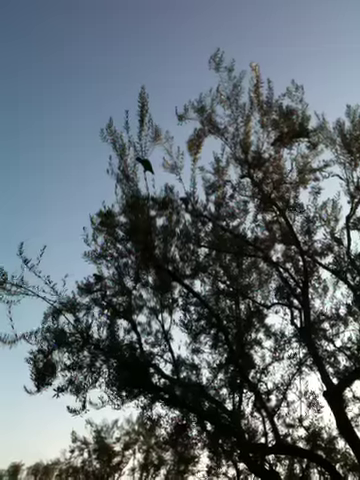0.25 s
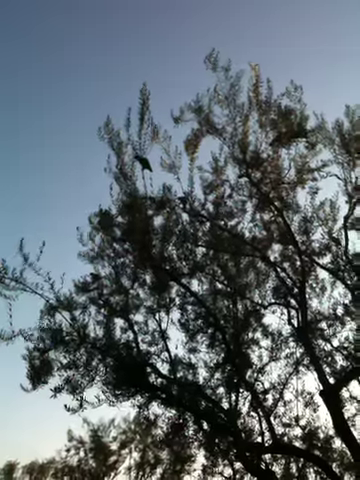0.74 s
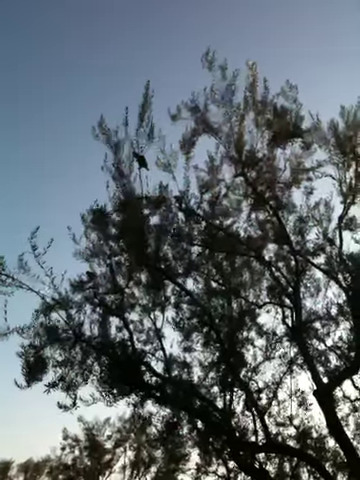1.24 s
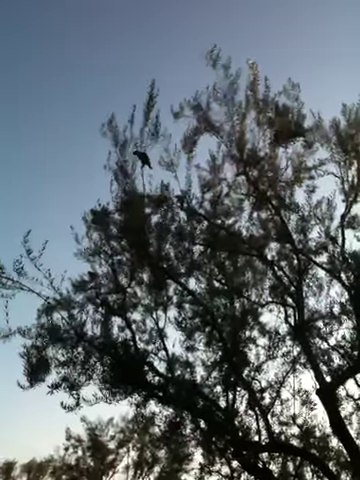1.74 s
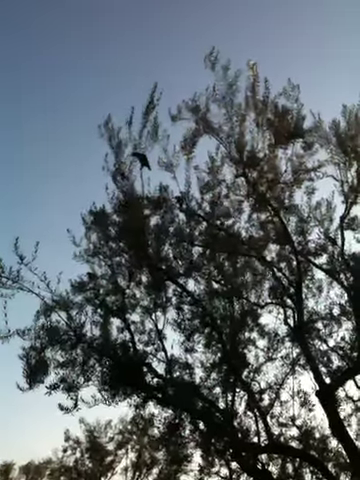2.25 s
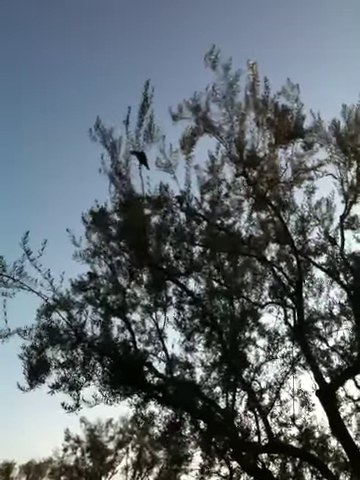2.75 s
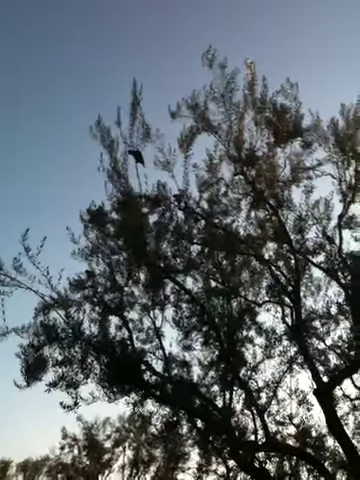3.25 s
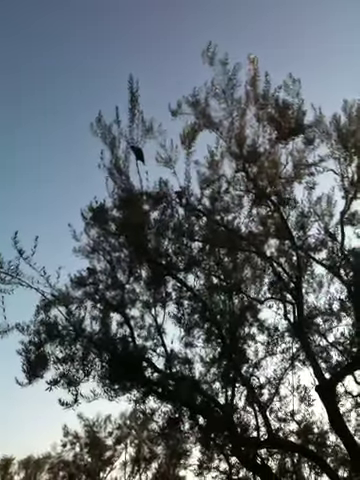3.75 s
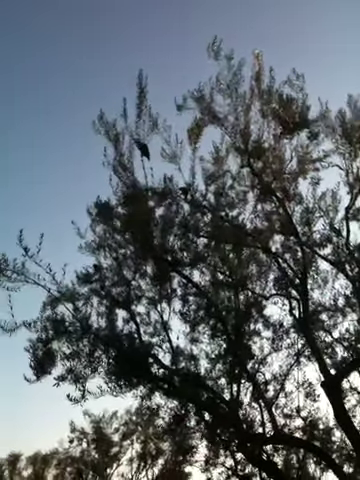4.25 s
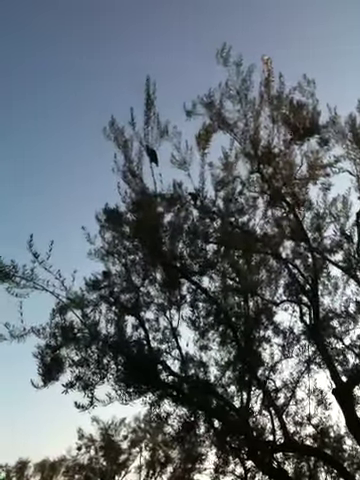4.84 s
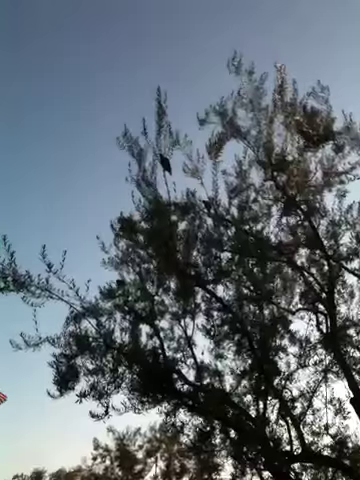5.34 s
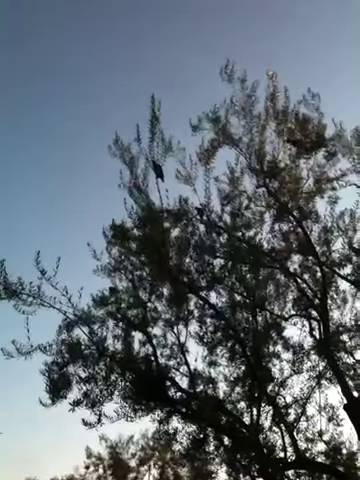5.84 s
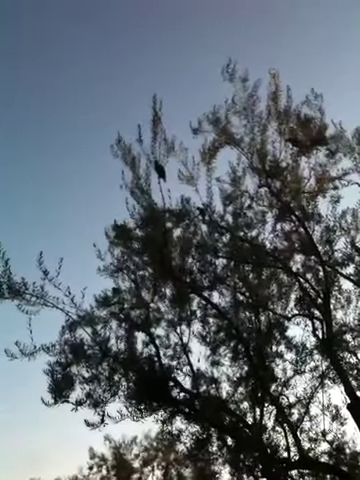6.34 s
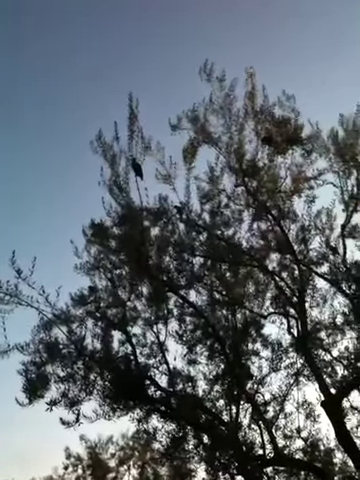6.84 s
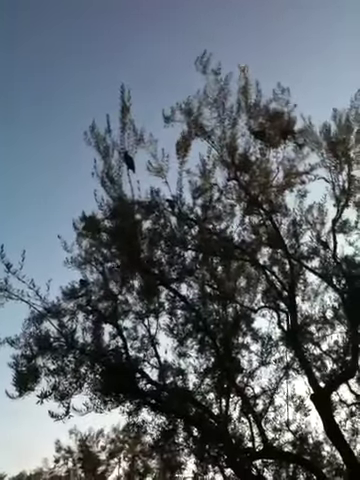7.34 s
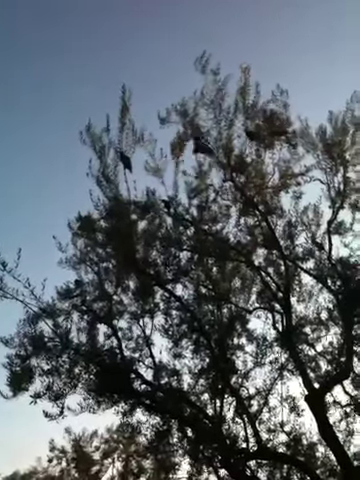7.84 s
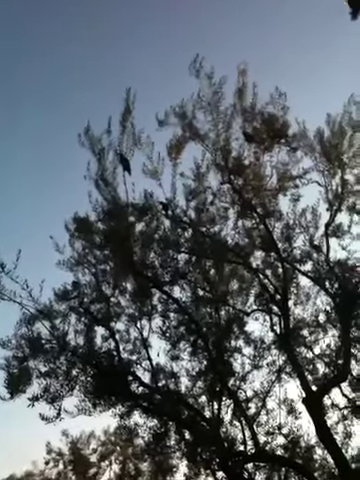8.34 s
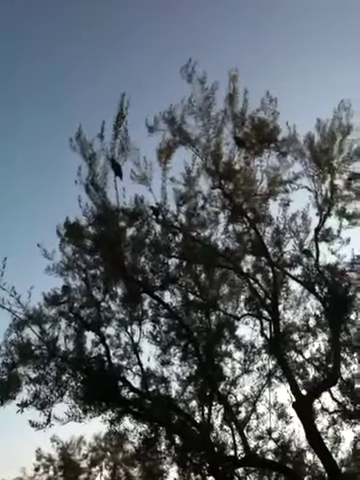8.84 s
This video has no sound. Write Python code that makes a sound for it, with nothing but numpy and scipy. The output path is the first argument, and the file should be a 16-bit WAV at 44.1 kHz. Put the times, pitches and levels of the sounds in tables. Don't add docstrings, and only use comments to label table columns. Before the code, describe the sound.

Outdoor phone capture of a small parrot flock: harsh, nasal squawks around a few kilohertz, broken by quick whistles and buzzing slides. Calls come in clusters with short gaps; a strong pair at four seconds, a lull with a soft far hoarse call at six, then dense loud screeching from seven to just past eight. Low, muffled wind bumps and a dull distant hum lie underneath.

```python
import sys
import numpy as np
from scipy import signal
from scipy.fft import rfft, irfft, next_fast_len
from scipy.io import wavfile
from scipy.ndimage import uniform_filter1d, map_coordinates

SR = 44100
rng = np.random.default_rng(int(sys.argv[2]) if len(sys.argv) > 2 else 0)


def invert_db(level):
    return 10 ** (np.asarray(level, dtype=float) / 20)


def file_out(sig):
    cols = np.atleast_2d(sig).T
    lim = np.clip(cols, -1, 1)
    pcm = np.round(lim * 32767).astype(np.int16)
    wavfile.write(sys.argv[1], SR, pcm)


N = 401310


def unit(x):
    return x / np.sqrt(np.mean(x ** 2) + 1e-20)


def level(x, span_s):
    power = uniform_filter1d(x ** 2, int(span_s * SR))
    return x / np.sqrt(np.abs(power) + 1e-12)


def curves(rows):
    time_s, *columns = np.transpose(rows)
    return [np.interp(np.arange(N) / SR, time_s, column) for column in columns]


def wobble(rate_hz):
    knots = rng.standard_normal(int(N * rate_hz / SR) + 4)
    return map_coordinates(knots, [np.arange(N) * rate_hz / SR])


def coloured(x, points):
    size = next_fast_len(N + 8192)
    hz, db = np.transpose(points)
    bins_hz = np.fft.rfftfreq(size, 1 / SR)
    gain = invert_db(np.interp(np.log(bins_hz + 1), np.log(hz), db))
    return irfft(rfft(x, size) * gain, size)[:N]


# pitch_hz, level_db (per Hz)
HUM_SPECTRUM = [(120, -17), (200, -2), (407, -9), (1950, -13.5), (2700, -22.5), (7770, -26), (11600, -38),
                (15500, -46)]


def hum():
    noise = unit(coloured(rng.standard_normal(N), HUM_SPECTRUM))
    return invert_db(-54 + 1.14 * wobble(3.07)) * noise


# start_s, level_db (peak), pitch_hz
STRONG_PUFFS = [(2.035, -30, 233), (2.714, -22, 209), (2.758, -28.5, 170), (2.861, -18.5, 328.5),
                (2.886, -21.5, 219.5), (2.901, -33, 146.4), (2.98, -26, 240), (2.996, -30.5, 164.8),
                (3.052, -26.5, 212), (3.069, -28.5, 193), (3.313, -30, 156), (3.901, -28, 202.6),
                (3.923, -29.5, 221.7), (3.942, -29, 196.7), (4.101, -27, 254), (4.118, -27, 207),
                (4.131, -27, 226.2), (4.546, -29, 238.4), (4.861, -26.5, 193.4), (5.195, -29.5, 271.5),
                (5.274, -28.5, 210.3), (5.304, -28.5, 237.3), (5.364, -21.5, 178.2), (5.384, -23.5, 241),
                (5.397, -27, 213.5), (5.432, -24.5, 220.4), (9.069, -21.5, 254.5), (9.08, -23, 269.4)]
LIGHT_PUFFS = [3.108, 3.185, 3.212, 3.235, 3.252, 3.27, 3.504, 4.077, 4.153, 4.388, 4.632, 4.733, 5.059,
               5.1, 5.244, 7.814, 8.192, 8.347, 8.565, 9.027]
FAINT_PUFFS = [1.226, 1.634, 1.737, 1.862, 1.932, 2.089, 2.649, 2.796, 3.679, 3.797, 3.857, 4.482, 4.608,
               5.017, 5.479, 7.756, 8.472, 8.73, 8.805, 8.943]
# start_s, level_db
BREEZE = [(0, -59), (.7, -58), (1.7, -57.5), (2.1, -58.5), (2.35, -52), (2.6, -60), (3.4, -53.5),
          (3.68, -47), (3.82, -49.5), (4.95, -51), (5.06, -60.5), (5.16, -57.5), (5.7, -55.5), (7.3, -54.5),
          (7.85, -53), (8.45, -49.5), (8.75, -51.5), (9.1, -43.5)]
# pitch_hz, level_db (per Hz)
PORT = [(24, -61), (40, -33), (134, 1), (189, 1), (326, -13), (412, -17.5), (501, -18), (900, -28),
        (1170, -21), (1980, -120)]


def wind():
    soft_hz = 206
    puffs = list(STRONG_PUFFS)
    puffs += [(s, -33.5, soft_hz * invert_db(1.87 * rng.standard_normal())) for s in LIGHT_PUFFS]
    puffs += [(s, -44.5, soft_hz * invert_db(2 * rng.standard_normal() - 2.5)) for s in FAINT_PUFFS]
    out = np.zeros(N + SR)
    for start_s, level_db, pitch_hz in puffs:
        cycles = np.arange(-600, 900) / SR * pitch_hz
        shape = np.exp(-(cycles / np.where(cycles < 0, .45, .8)) ** 2 / 2)
        wave = np.cos(2 * np.pi * (cycles - 0.21 * cycles * cycles + rng.uniform(0, 1)))
        out[round(start_s * SR) - 600:][:1500] += invert_db(level_db) * shape * wave
    thumps = coloured(out[:N], [(50, -19), (120, 3.5)])
    gust = uniform_filter1d(uniform_filter1d(np.abs(thumps), size=5000), size=5000)
    lumps = invert_db(4 * wobble(55) + 1.5 * wobble(7))
    flutter = unit(coloured(lumps * rng.standard_normal(N), PORT))
    return thumps + (invert_db(curves(BREEZE)[0]) + 1.13 * gust) * flutter


# start_s (full voice), held_s, level_db, pitch_hz (first), bright_db
SWELLING = [(.72, 0.14, -41.5, 1633, -5), (1.069, .14, -41, 1680, -3), (1.361, 0.16, -40.5, 2580, -9.5),
            (2.52, 0.057, -36.5, 2497, -1), (2.86, 0.18, -44.5, 2798, -8.5),
            (3.76, 0.07, -40.5, 2462, -5.5), (3.939, .12, -45.5, 2003, -9), (4.74, 0.15, -31, 2513, -7),
            (6.06, 0.051, -46.5, 1518, -13), (7.371, 0.18, -32, 2307, -3), (7.65, 0.059, -26, 2426, -5.5),
            (8.295, 0.044, -31.5, 1955, -14), (9.06, 0.043, -37.5, 1570, -16)]
# start_s (full voice), held_s, level_db, pitch_hz (first), bright_db
BURSTING = [(.07, 0.14, -34, 2390, -6.5), (.19, 0.11, -39.5, 2250, -6.5), (0.969, 0.072, -39.5, 1753, -8),
            (2.15, 0.017, -45, 1563, -9), (2.396, 0.088, -39, 2756, -5.5), (3.585, 0.078, -43, 2597, -1),
            (3.702, .033, -45.5, 2550, -4), (4.095, 0.094, -32.5, 2916, -7),
            (4.2, 0.087, -31.5, 2682, -4.5), (4.937, 0.045, -42, 2805, 6.5),
            (5.31, 0.083, -40.5, 2580, -7.5), (5.435, 0.06, -39, 2794, -8.5),
            (6.727, 0.0122, -40, 2414, -9), (6.764, 0.17, -37, 2535, -7), (6.947, 0.028, -31.5, 2425, -2),
            (7.007, .022, -28, 2393, -8), (7.145, 0.045, -41, 2817, -6.5),
            (7.595, 0.029, -29.5, 2477, -6.5), (7.72, 0.094, -30, 2375, -5),
            (7.819, 0.031, -29.5, 2032, -14), (7.902, 0.035, -34, 2750, -8.5),
            (7.95, 0.091, -30.5, 2707, -5.5), (8.031, 0.14, -29.5, 2316, -7.5)]
# start_s (full voice), held_s, level_db, pitch_hz (first)
DISTANT = [(0.321, 0.15, -41.5, 2422), (1.634, 0.036, -48, 2505), (8.19, 0.028, -41.5, 1785),
           (0.879, 0.072, -46, 2104), (1.24, 0.093, -45.5, 2690), (1.58, 0.32, -51.5, 2450),
           (1.959, 0.04, -51, 2075), (2.3, 0.019, -50.5, 1707), (2.72, 0.038, -53, 2011),
           (3.07, 0.075, -55.5, 2847), (3.28, 0.27, -55.5, 2778), (4.32, 0.31, -46, 1991),
           (5.03, 0.066, -46, 2160), (5.149, 0.069, -57, 2530), (5.551, 0.17, -57, 2455),
           (6.23, 0.17, -53.5, 2783), (6.45, 0.16, -61, 3000), (7.049, 0.036, -43, 2657),
           (8.62, 0.094, -58.5, 2074), (8.961, 0.045, -58.5, 1570)]


def calls():
    swell, burst, murmur = (200, 4, 700, 0.29), (574, -3, 350, -0.5), (150, -2, 130, -9)
    distant_bright_db, sag_per_s = -9, .45
    rows = [row + swell for row in SWELLING]
    rows += [row + burst for row in BURSTING]
    rows += [row + (distant_bright_db,) + murmur for row in DISTANT]
    start, held, db, hz, bright_db, rise, change_db, fall, clarity_db = np.transpose(rows)[:, :, None]
    t = np.arange(0, N / SR, .001)
    edge_db = np.minimum(0, np.minimum((t - start) * rise, (start + held - t) * fall))
    held_db = change_db * (np.clip((t - start) / held, 0, 1) - .5)
    power = invert_db(db + held_db + edge_db) ** 2
    total = power.sum(axis=0) + 1e-12
    lead = power.argmax(axis=0)
    since_start = np.clip(t - start[lead, 0], 0, held[lead, 0])
    pitch = hz[lead, 0] * (1 - sag_per_s * since_start)
    blend_db = (power * bright_db).sum(axis=0) / total
    return curves(np.transpose([t, 10 * np.log10(total), blend_db, pitch, clarity_db[lead, 0]]))


# start_s, length_s, pitch_hz (vibration), clarity_db
PLAIN = [(.082, .07, 2390, 7), (.154, .02, 2345, 14), (.218, .023, 2163, 12), (.285, .028, 1993, 14),
         (.417, .028, 2328, 12), (.704, .04, 1652, 5), (.8, .07, 1600, 6), (1.131, .048, 1651, 6),
         (3.582, .032, 2638, 14), (3.7, .04, 2570, 13), (4.081, .02, 2734, 14), (4.775, .052, 3114, 10),
         (4.912, .02, 2720, 12), (6.763, .036, 2560, 14), (6.8, .09, 2450, 2), (6.89, .048, 2532, 14),
         (6.938, .02, 2419, 18), (7.69, .032, 2400, 21), (7.752, .031, 2250, 21), (7.818, .06, 2040, 20),
         (7.968, .028, 2321, 14), (8.025, .04, 2180, 14), (8.088, .03, 2010, 10), (8.143, .028, 1970, 16),
         (8.191, .036, 1810, 11), (7.645, .045, 2390, 12), (7.722, .03, 2300, -6), (4.935, .055, 2700, -6),
         (3.615, .06, 2560, 9), (4.255, .022, 3080, 15)]
# start_s, length_s, pitch_hz (vibration), clarity_db
DOUBLED = [(1.175, .05, 3150, 11), (1.467, .024, 2535, 9), (1.519, .027, 2473, 11), (2.153, .02, 1565, 12),
           (2.401, .02, 2780, 11), (2.538, .024, 2880, 12), (2.566, .024, 2600, 11),
           (2.832, .047, 2574, 11), (2.879, .02, 1530, 13), (3.027, .032, 2770, 13),
           (3.755, .022, 2428, 11), (4.163, .02, 2560, 16), (4.28, .018, 2570, 14), (4.192, .024, 2353, 13),
           (4.751, .024, 2537, 11), (5.28, .1, 2650, 11), (5.426, .035, 2700, 13), (5.468, .02, 2800, 13),
           (5.494, .02, 2600, 13), (6.04, .08, 1510, 9), (7.042, .02, 2650, 16), (7.469, .044, 2880, 13),
           (7.513, .04, 2760, 13), (7.9, .068, 2760, 7)]
# start_s, length_s, pitch_hz (vibration), clarity_db
TRIPLED = [(.174, .044, 2300, 5), (.241, .044, 2110, 6), (1.985, .04, 2090, 11), (3.777, .062, 2420, 12),
           (4.827, .028, 2430, 7), (6.352, .038, 2544, 8), (6.958, .044, 2400, 6), (7.002, .04, 2385, 19),
           (8.285, .085, 1950, 1), (7.783, .035, 2150, 8), (9.065, .035, 2139, 2)]
# start_s, first_hz, last_hz
SWOOPS = [
    (4.855, 2900, 2650),
]


def voice_box(pitch, clarity_db):
    note_sag = .025
    notes = [row + (1, note_sag) for row in PLAIN]
    notes += [row + (2, note_sag) for row in DOUBLED]
    notes += [row + (3, note_sag) for row in TRIPLED]
    notes += [(s, .028, hz, 12, 1, 1 - last_hz / hz) for s, hz, last_hz in SWOOPS]
    pitch, clarity_db, pattern = pitch.copy(), clarity_db.copy(), np.full(N, 2)
    for start_s, length_s, hz, db, cycles, sag in notes:
        span = slice(round(start_s * SR), round((start_s + length_s) * SR))
        pitch[span] = hz * np.linspace(1, 1 - sag, span.stop - span.start)
        clarity_db[span] = db
        pattern[span] = cycles
    return pitch, pattern, uniform_filter1d(clarity_db, size=130)


def comb(pitch, pattern, accent, count):
    cycles = np.cumsum(pitch / pattern) / SR
    fade = invert_db(4 * wobble(80))
    lines = np.zeros(N)
    for k, turn in enumerate(rng.uniform(0, 1, count), start=1):
        whole = np.where(k > pattern, .6, 1)
        size = np.where(k % pattern == 0, whole, accent)
        size = size * (k * pitch / pattern < SR / 2.5)
        lines += size * np.roll(fade, k * SR // 3) * np.cos(2 * np.pi * (k * cycles + turn))
    return lines


def chaos(pitch, rate_hz):
    clock = np.cumsum(rate_hz * invert_db(4 * wobble(40))) / SR
    scrap = clock.astype(int)
    progress = clock - scrap
    draw = rng.uniform(-1, 1, (scrap[-1] + 1, 4))[scrap].T
    slide = 1 + .11 * draw[0] - (.02 + .06 * draw[1]) * (progress - .5) + .018 * wobble(400)
    scraps = comb(pitch * slide, np.where(draw[2] > .2, 3, 2), accent=.85, count=16)
    swell = invert_db(2.5 * draw[3]) * (1.2 + np.sin(np.pi * progress))
    air = rng.standard_normal(N) * invert_db(2.5 * wobble(200))
    return unit(swell * scraps) + .85 * air


# start_s, length_s, level_db (change)
GULPS = [(3.74, .016, -14.5), (6.744, 0.018, -10.5), (6.927, 0.01684, -10), (7.112, 0.024, -5),
         (7.561, .02, -9), (7.829, 0.0082, -11.5), (7.88, 0.03, -6.5), (8.226, .045, -8.5),
         (2.491, 0.017, -4), (5.416, 0.02, -1)]


def gulps():
    change_db = np.zeros(N)
    for start_s, length_s, db in GULPS:
        change_db[round(start_s * SR):round((start_s + length_s) * SR)] = db
    return invert_db(uniform_filter1d(change_db, size=90))


# pitch_hz, level_db
WHISTLE = [(600, -16), (1100, -10), (1600, -9.5), (2300, -3.5), (3200, 0.5), (4300, -3), (5500, -11),
           (7500, -8), (10000, -22), (16000, -47)]
# pitch_hz, level_db (per Hz)
RASP = [(290, -67), (500, -23), (839, -17), (1120, -13), (1430, -6.5), (1770, -5.5), (2290, -4.5),
        (2500, -1.5), (4320, -6), (6550, -11), (7450, -8.5), (15500, -47)]


def parrots():
    level_db, bright_db, *voice = calls()
    pitch, pattern, clarity_db = voice_box(*voice)
    tremble = 1 + .006 * wobble(90) + .009 * wobble(500)
    clear = comb(pitch * tremble, pattern, accent=0.39, count=17)
    share = 1 / (1 + invert_db(9 - clarity_db - 3 * wobble(70)) ** 2)
    whistle = level(coloured(clear, WHISTLE), .03)
    rasp = level(coloured(chaos(pitch, rate_hz=90), RASP), .06)
    cry = np.sqrt(share) * whistle + np.sqrt(1 - share) * rasp
    middle = coloured(cry, [(2100, -60), (2700, 0)])
    cry = cry + (invert_db(np.minimum(0, bright_db + 8)) - 1) * middle
    top = coloured(cry, [(4300, -60), (5600, 0)])
    sheen = invert_db(1.8 * (level_db + 29)) * coloured(cry, [(9500, -60), (12000, 1.5)])
    return gulps() * invert_db(level_db - 0.53) * (sheen + cry - top + invert_db(bright_db + 5.5) * top)


def slid(rows):
    return [(s, np.linspace(hz, last_hz, round(length * SR)), db) for s, length, hz, last_hz, db in rows]


def sung(notes, sizes, hoarse):
    out = np.zeros(N)
    shake = 1 + hoarse * wobble(300)
    flicker = invert_db(3 * wobble(90))
    for start_s, hz, db in notes:
        first = round(start_s * SR)
        hz = hz[:N - first]
        span = slice(first, first + len(hz))
        turn = 2 * np.pi * np.cumsum(hz * shake[span]) / SR
        edge = np.abs(np.sin(np.linspace(0, np.pi, len(hz)))) ** .4
        for k, size in enumerate(sizes, start=1):
            strength = invert_db(db) * size * edge * np.roll(flicker, k * 9000)[span]
            out[span] += strength * np.sin(k * turn + k * k)
    return out


# start_s, length_s, first_hz, last_hz, level_db
GAPES = [(.065, .13, 2400, 2300, -40), (.19, .12, 2200, 1850, -41), (.38, .11, 2600, 2400, -50),
         (.71, .16, 2900, 2700, -49), (.985, .13, 3700, 3400, -45), (1.44, .1, 3700, 3600, -52),
         (2.39, .085, 2300, 2900, -48), (2.86, .07, 2700, 3200, -50), (2.96, .08, 2900, 2700, -50),
         (3.6, .08, 3100, 2900, -49), (3.59, .09, 5000, 4700, -50), (4.1, .07, 2800, 4000, -38),
         (4.215, .07, 3600, 2900, -38), (4.72, .12, 3000, 3900, -40), (4.85, .065, 4100, 3500, -37),
         (5.3, .09, 3800, 3700, -46), (5.43, .085, 4100, 3600, -46), (6.055, .065, 1500, 1400, -50),
         (6.055, .065, 4700, 4900, -56), (6.2, .23, 3400, 3200, -57), (6.8, .11, 4900, 4700, -42),
         (6.8, .07, 3000, 2800, -43), (6.945, .06, 4800, 4600, -39), (7.05, .06, 2700, 2300, -46),
         (7.135, .06, 2600, 2900, -46), (7.35, .12, 3100, 3300, -39), (7.36, .19, 4500, 4200, -39),
         (7.59, .1, 3500, 3600, -35), (7.775, .045, 3800, 3800, -35), (7.92, .16, 4700, 4200, -38),
         (8.285, .085, 1500, 1400, -42), (8.29, .075, 3800, 3700, -42), (8.29, .075, 1950, 1850, -40),
         (4.14, .15, 7500, 7300, -46), (9.055, .045, 1450, 1500, -43), (3.545, .04, 4500, 4700, -54),
         (1.955, .055, 8400, 8150, -62), (3.935, .07, 3300, 2900, -53)]


def gapes():
    return sum(sung(slid(GAPES), [1], hoarse=.062) for voice in range(2))


# start_s, length_s, first_hz, last_hz, level_db
PIPES = [(.1, .12, 1600, 1540, -46), (1.896, .03, 5301, 4201, -60), (1.969, .022, 4001, 2801, -56),
         (1.976, .012, 5301, 4601, -58), (1.9, .07, 2000, 1950, -57), (1.985, .035, 2150, 2000, -57),
         (2.08, .03, 2020, 2080, -55), (2.72, .06, 2000, 1950, -56), (3.541, .042, 2801, 3501, -52),
         (7.754, .03, 2260, 2180, -32), (7.835, .025, 2050, 2000, -33), (4.4, .03, 1980, 1860, -52),
         (4.44, .05, 1800, 2020, -49), (4.515, .055, 1950, 2060, -48), (4.3, .07, 3050, 3000, -50),
         (4.563, .032, 2420, 2130, -46), (7.36, .09, 1400, 1380, -46), (7.585, .065, 1520, 1460, -40),
         (7.9, .078, 1380, 1320, -42), (7.99, .03, 2150, 2050, -33), (8.0, .09, 1380, 1400, -43),
         (8.13, .07, 1350, 1270, -44), (8.063, .025, 2330, 2300, -33), (7.645, .075, 2370, 2340, -32),
         (7.47, .08, 2880, 2660, -35), (8.621, .075, 2101, 1921, -57), (8.7, .085, 2081, 1901, -56),
         (8.94, .1, 1520, 1600, -58), (5.53, .16, 1370, 1330, -58), (7.17, .05, 2500, 2350, -48),
         (1.085, .03, 1300, 1270, -52), (.7, .18, 1680, 1560, -50), (.72, .03, 3200, 3320, -46),
         (.97, .09, 1690, 1650, -49), (1.13, .05, 1640, 1710, -48), (6.675, .052, 2950, 3000, -50),
         (.658, .045, 5601, 5651, -57), (4.915, .02, 2750, 2600, -44), (4.025, .03, 3200, 3450, -52),
         (.2, .11, 2250, 1950, -41)]


def pipes():
    return sung(slid(PIPES), [np.sqrt(2), invert_db(-13)], hoarse=.018)


# start_s, length_s, first_hz, last_hz, level_db
GLIDES = [(4.826, .028, 816, 806, -41), (4.856, .024, 1451, 1281, -37), (4.883, .03, 1481, 1131, -39),
          (4.936, .024, 1476, 1291, -37), (4.963, .027, 1371, 971, -35), (8.084, .048, 1481, 1461, -35),
          (8.291, .075, 651, 626, -48), (5.469, .02, 1401, 1291, -49), (5.493, .022, 1331, 1171, -49),
          (2.401, .022, 1401, 1341, -45), (2.431, .022, 1341, 1241, -45), (2.459, .022, 1331, 1251, -45),
          (7.136, .04, 1501, 1251, -49), (6.723, .03, 701, 761, -50), (.981, .07, 901, 881, -50),
          (2.538, .024, 1451, 1381, -45), (2.566, .024, 1331, 1211, -44), (8.62, .028, 2001, 1901, -62),
          (8.72, .028, 2051, 1991, -64)]
# pitch_hz, level_db
BUZZ = [(600, -16), (1400, -17), (2500, -7), (4200, 0), (5800, -3), (7500, -6), (12000, -26)]


def glides():
    return coloured(sung(slid(GLIDES), np.ones(9), hoarse=.015), BUZZ)


# start_s, length_s, pitch_hz (deepest), level_db
CROAKS = [(4.112, 0.042, 901, -46.5), (4.208, 0.04, 890, -44), (4.768, 0.038, 842, -45),
          (7.648, .048, 1160, -38), (7.71, .05, 840, -34), (7.772, .052, 730, -37), (8.053, 0.04, 809, -48),
          (8.111, 0.031, 797, -43), (8.174, 0.034, 839, -49)]
CROAK_OVERTONES = [.5, 1.6, 1.1, 1, 1.1, .8, .8, .5]


def croaks():
    edge_hz = 1450
    dives = []
    for start_s, length_s, deepest_hz, level_db in CROAKS:
        bowl = np.abs(np.sin(np.linspace(0, np.pi, round(length_s * SR)))) ** .4
        dives.append((start_s, edge_hz - (edge_hz - deepest_hz) * bowl, level_db))
    return sung(dives, CROAK_OVERTONES, hoarse=.012)


# start_s, length_s, first_hz, last_hz, level_db
FAR = [
    (6.0, .13, 770, 735, -54),
    (5.52, .2, 700, 680, -64),
]
# multiple, level_db
FAR_OVERTONES = [(1, 10.5), (2, 0.5), (3, -26), (4, -27)]


def far_call():
    t = np.arange(N) / SR
    out = np.zeros(N)
    for start_s, length_s, first_hz, last_hz, db in FAR:
        progress = np.clip((t - start_s) / length_s, 0, 1)
        pitch = (first_hz + (last_hz - first_hz) * progress) * (1 + .05 * wobble(250))
        cycles = np.cumsum(pitch) / SR
        note = sum(invert_db(size_db) * np.sin(2 * np.pi * k * cycles) for k, size_db in FAR_OVERTONES)
        edge = np.sqrt(np.abs(np.sin(np.pi * progress))) * (progress < 1)
        out += invert_db(db + 2.0 * wobble(87)) * edge * note
    return out


def trees(x, t60):
    t = np.arange(int(t60 * SR)) / SR
    tail = rng.standard_normal(len(t)) * invert_db(-60 * t / t60) * (t > .006)
    echoes = signal.fftconvolve(x, tail / np.linalg.norm(tail))[:N]
    return coloured(echoes, [(2000, 0), (9000, -4)])


def scene():
    air = hum() + wind()
    birds = parrots() + gapes() + pipes() + glides() + croaks() + far_call()
    return (birds + invert_db(-11) * trees(birds, t60=.25) + air)[None]


def roll_off(x):
    return signal.sosfilt(signal.butter(12, 15700, fs=SR, output="sos"), x)


def record(dry):
    heard = coloured(dry[0], [(30, -24), (60, -0.5), (15000, -0.5), (15700, 9)])[None]
    is_open = np.arange(N) >= 0.062 * SR
    return roll_off(heard * is_open)


dry = scene()
out = record(dry)
file_out(out)
```